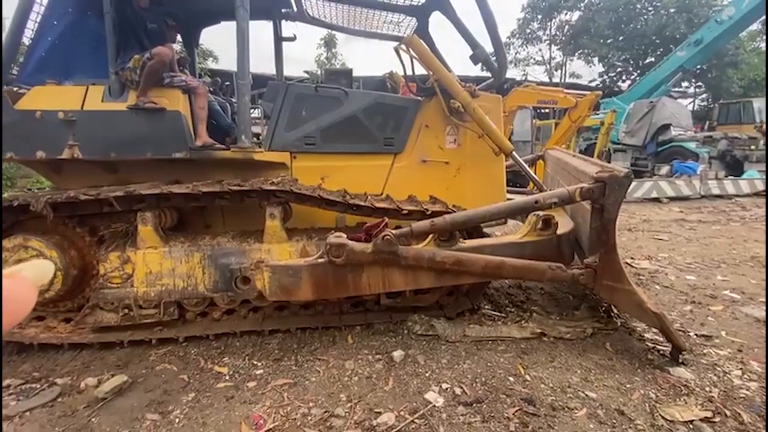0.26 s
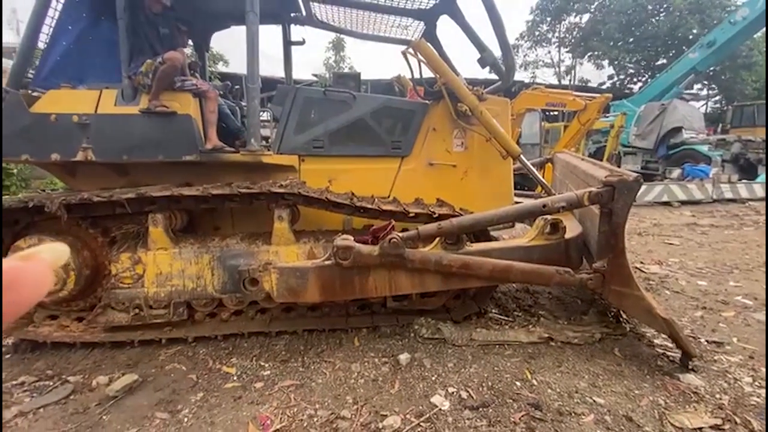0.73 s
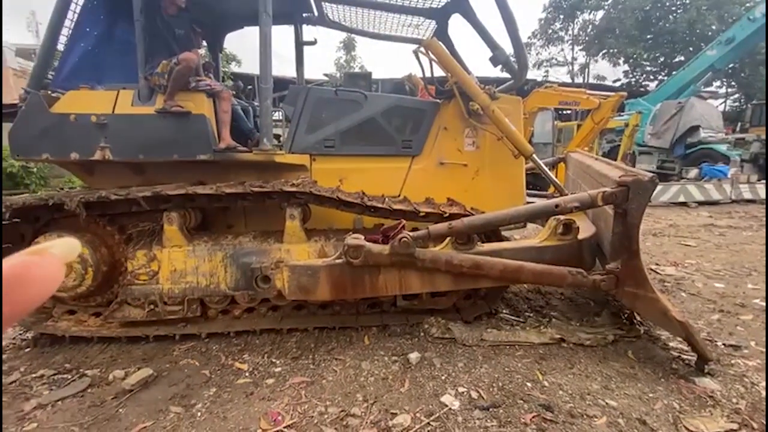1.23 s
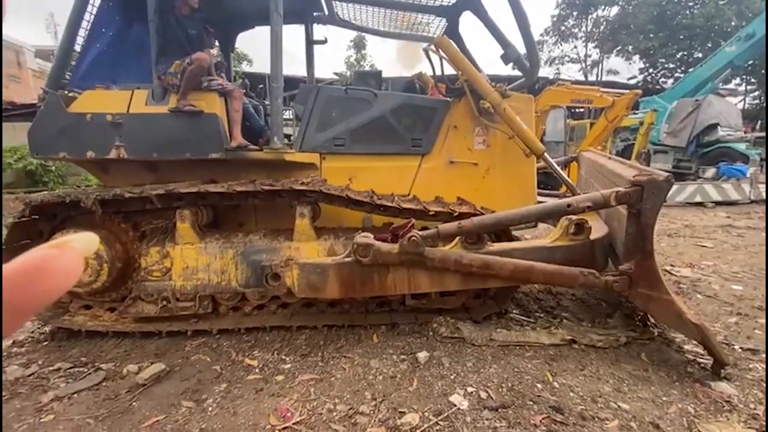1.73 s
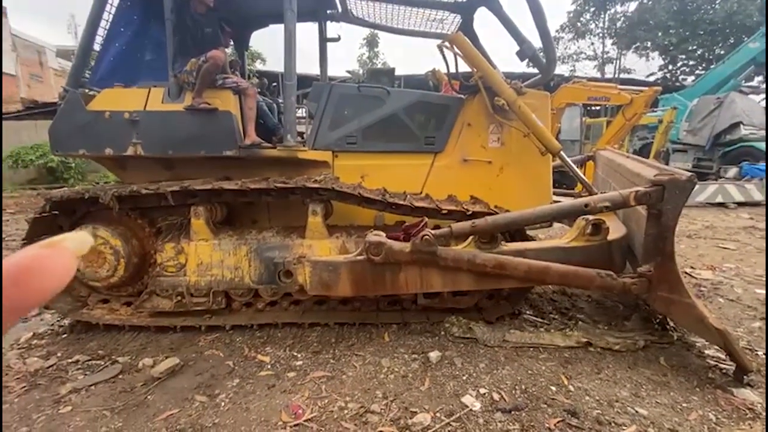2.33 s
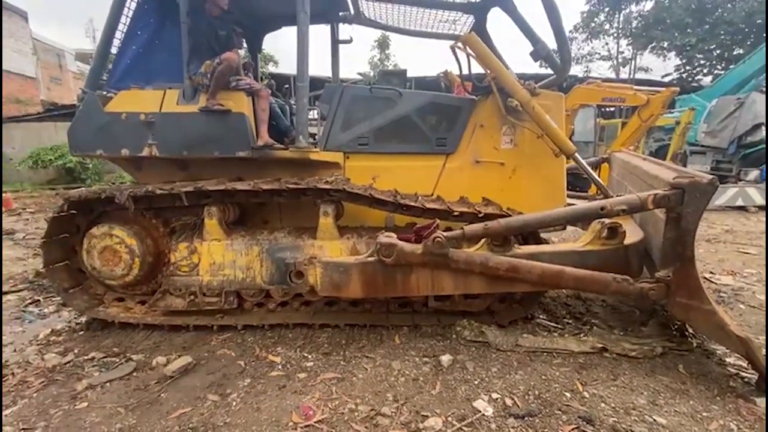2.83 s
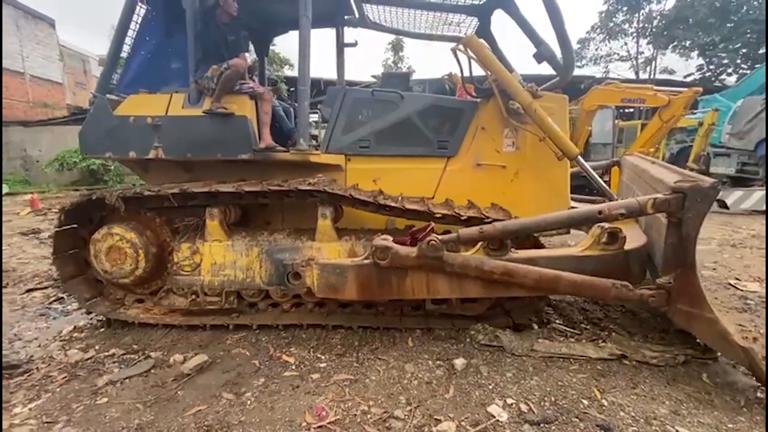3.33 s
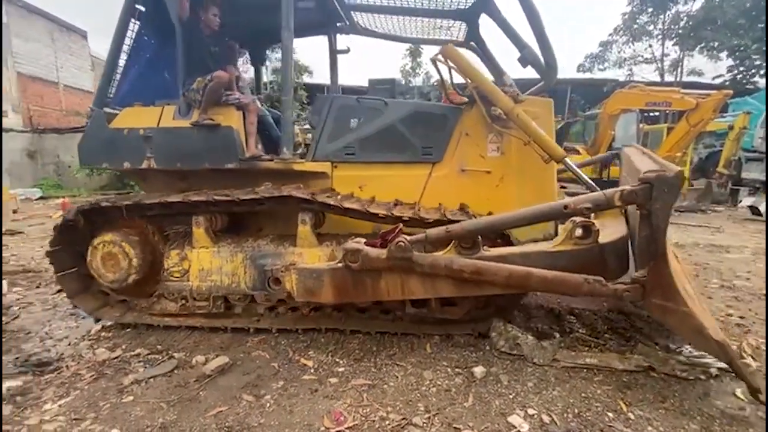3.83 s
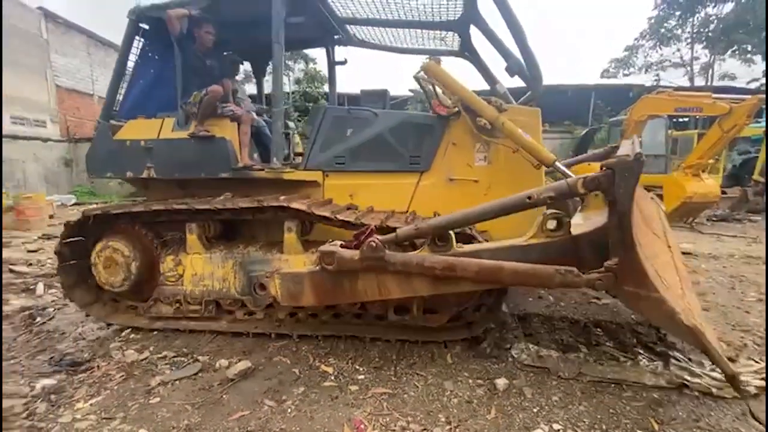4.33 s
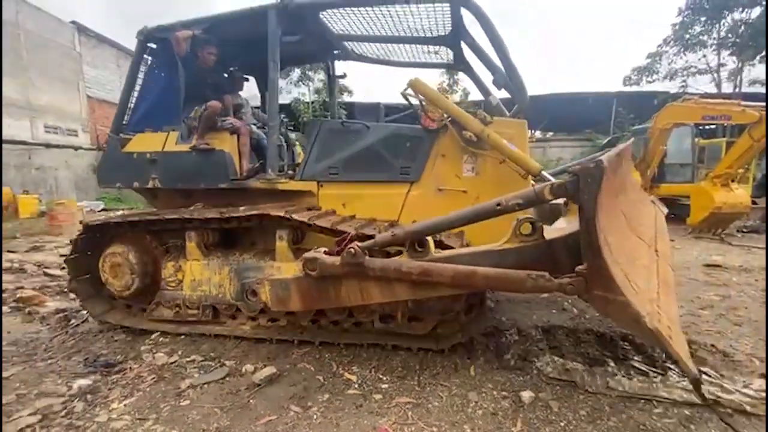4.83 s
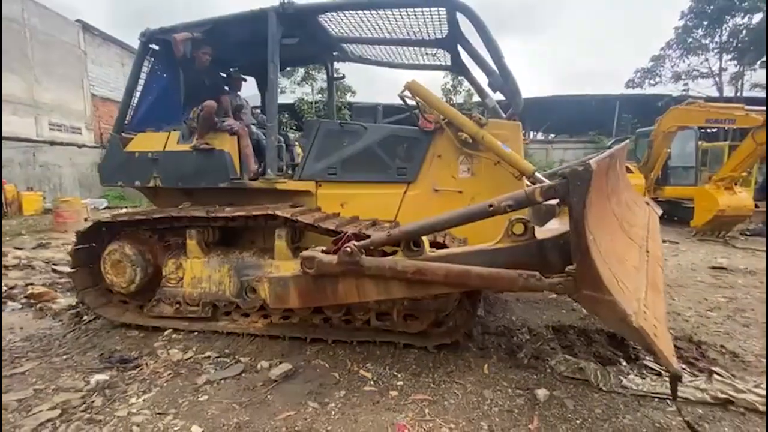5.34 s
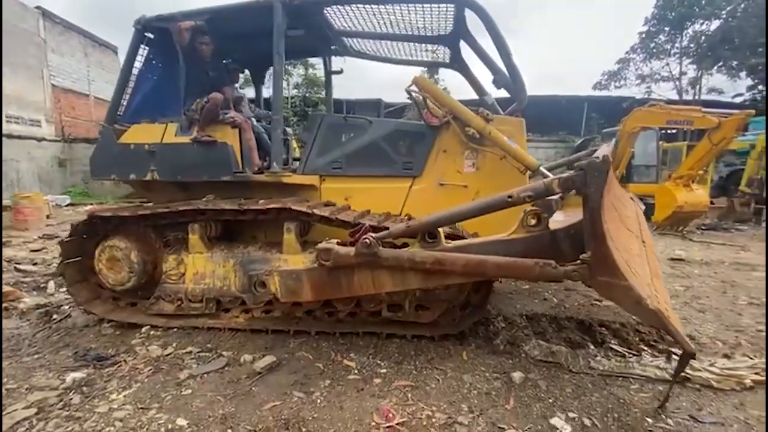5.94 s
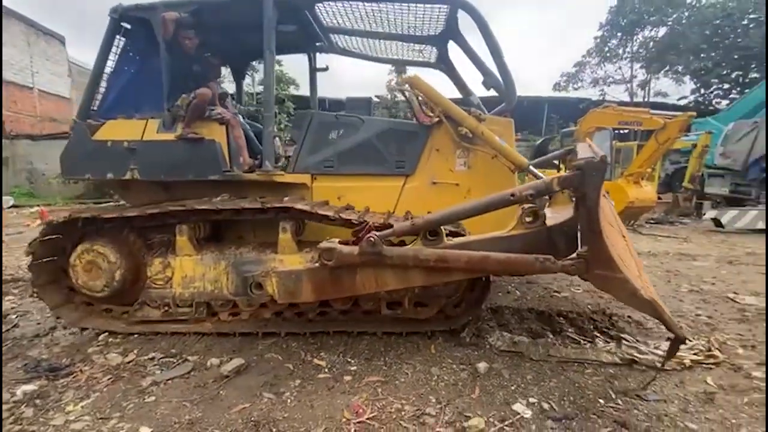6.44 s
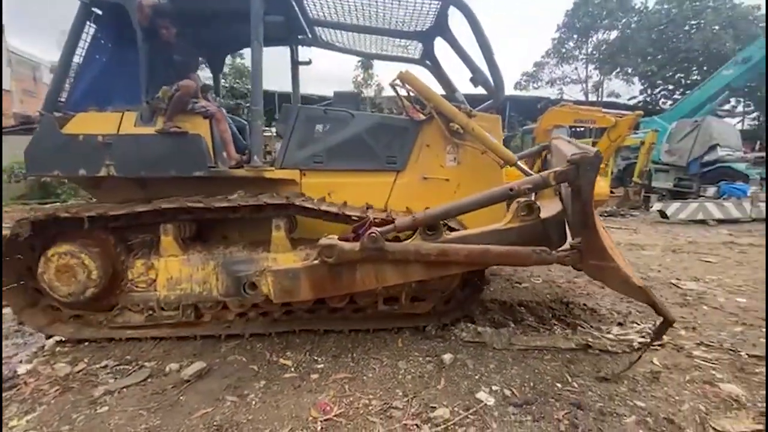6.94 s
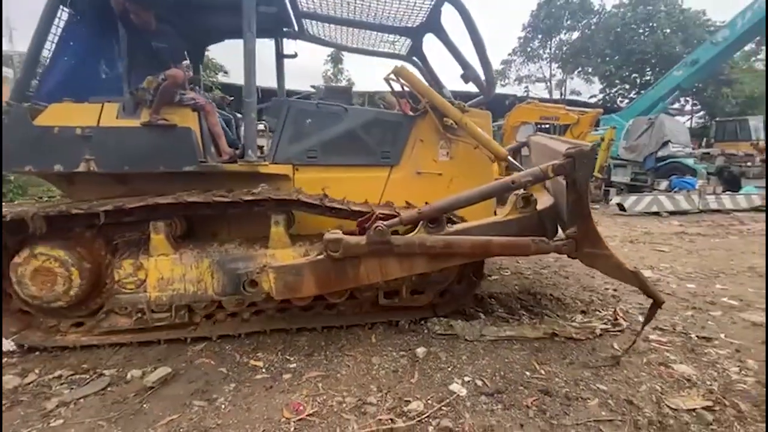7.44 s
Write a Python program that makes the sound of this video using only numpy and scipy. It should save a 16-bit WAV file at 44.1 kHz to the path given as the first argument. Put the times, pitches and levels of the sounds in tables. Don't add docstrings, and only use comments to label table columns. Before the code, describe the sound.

A large bulldozer's diesel, heard a few metres away in an open dirt yard, winds down from a rev with a falling turbo whistle. It is then revved in short bursts, each starting with hard metallic knocks, and settles between them to a low drone with fan hum and rattling casing. Light wind buffets the hand-held stereo microphone, which swings slightly off the engine.

```python
import sys
import numpy as np
from scipy import signal
from scipy.fft import rfft, irfft, next_fast_len
from scipy.io import wavfile
from scipy.ndimage import uniform_filter1d

SR = 44100
rng = np.random.default_rng(int(sys.argv[2]) if len(sys.argv) > 2 else 0)


def amplitude_ratio(level_db):
    exponent = np.asarray(level_db, float) / 20
    return 10 ** exponent


def wav_record(signal):
    frames = np.transpose(np.atleast_2d(signal))
    bounded = np.clip(frames, -1, 1)
    quanta = np.round(bounded * 32767).astype(np.int16)
    wavfile.write(sys.argv[1], SR, quanta)


N = 338247
TIME = np.arange(N) / SR
BINS_HZ = np.fft.rfftfreq(N, 1 / SR)
IDLE_HZ = 58

# time in seconds, firing rate in Hz.
CRANK_SPEED = [(0, 70.93), (.55, 57.23), (1.0, 47.94), (1.19, 47.17), (1.48, 64.87), (1.84, 54.9),
               (2.6, 56.68), (3.07, 55), (3.22, 61.44), (3.46, 65.84), (3.64, 56.52), (4.7, 57.23),
               (4.9, 60.2), (5.2, 58.4), (5.35, 62.35), (5.52, 57.6), (5.9, 60.32), (7.67, 60.4)]
# time in seconds, whistle in Hz.
TURBO_SPEED = [(0, 8920), (.64, 7180), (1.19, 5856), (1.49, 7930), (1.96, 6812), (2.5, 5960), (3.03, 5690),
               (3.29, 7550), (3.5, 8067), (3.66, 7240), (4.0, 7340), (4.78, 7202), (5.19, 6536),
               (5.36, 7220), (5.5, 6680), (5.8, 6925), (6.99, 6344), (7.67, 6462)]
# time in seconds, loss in the sum in dB.
CAMERA_TURN = [
    (0, 5),
    (.95, 2),
    (1.2, 2),
    (3.5, 2),
    (4.3, 3),
    (5.2, 0.5),
    (5.9, 1.5),
    (6.4, 4.5),
    (7.67, 4),
]
# frequency in Hz, likeness 0-1, phase left leads in rad,
# left-right in dB.
DIFFUSE_PORTS = [(60, 1, 0.5, -3), (307, 1, -0.5, 0.5), (600, 0.12, 0.5, 1), (904, 0.63, 1, 4.5),
                 (1300, 0.81, -1.04, 2), (1790, 0.15, 0.1, -2), (2260, 1, 0.83, -2.5), (3910, 0, 2, 1.5),
                 (4400, 0, 3.5, 2.5), (8900, 0, 7.5, 14.5)]


def evened(x):
    return x / np.sqrt(np.mean(x ** 2) + 1e-20)


def curves(rows):
    s, *columns = np.transpose(rows)
    return [np.interp(TIME, s, c) for c in columns]


def across(rows, count=1):
    table = np.transpose(rows)
    return np.interp(np.log(BINS_HZ + 1), np.log(table[0]), table[count])


def lagged(x, lag_s):
    keep = np.exp(-1 / (lag_s * SR))
    return signal.lfilter([1 - keep], [1, -keep], x - x[0]) + x[0]


def drift(hz):
    size = next_fast_len(N, True)
    response = 1 / (1 + (np.fft.rfftfreq(size, 1 / SR) / hz) ** 2)
    return evened(irfft(rfft(rng.standard_normal(size)) * response, size)[:N])


def heard(envelope, shape, modes, ports):
    a, b = rfft(rng.standard_normal((2, N)) * envelope)
    power = amplitude_ratio(across(shape)) ** 2
    for hz, width_hz, db in modes:
        power = power + amplitude_ratio(db) ** 2 / (1 + (2 * (BINS_HZ - hz) / width_hz) ** 2) ** 2
    same = np.clip(across(ports), 0, 1)
    lead_rad = across(ports, count=2)
    tilt = amplitude_ratio(across(ports, count=3) / 2)
    right = (same * a + np.sqrt(1 - same ** 2) * b) * np.exp(-1j * lead_rad)
    return evened(irfft(np.sqrt(power) * np.array([a * tilt, right / tilt]), N))


def firing_turns():
    return np.cumsum(curves(CRANK_SPEED)[0] * (1 + 0.0039 * drift(hz=8.2))) / SR


def fuel():
    # time in seconds, fuel 0-1.
    rack_settings = [(.6, 0.05), (1.0, 0.03), (1.193, 0.93), (1.471, 0.13), (1.53, 0.05), (1.96, 0.29),
                     (3.043, 0.98), (3.291, 0.67), (3.47, 0.14), (3.52, 0.1), (3.681, 0.51), (4.8, 0.12),
                     (5.205, 0.85), (5.34, 0.16), (5.57, 0.58), (5.9, 0.41), (6.6, 0.32)]
    open_lag_s, fall_lag_s = 0.012, 0.014
    s, setting = np.transpose(rack_settings)
    held = np.clip(np.r_[0, setting], 0, 1.2)[np.searchsorted(s, TIME, "right")]
    return np.maximum(lagged(held, open_lag_s), lagged(held, fall_lag_s))


def tones_db():
    # firing rate in Hz, octave level in dB.
    pipe_octave = [(47, -54), (54, -33.5), (60, -31.5), (67, -28.5)]
    light_fuel, firing_lag_s = 0.069, 0.017
    drone_cut_db, drone_on_db = -50, -23.5
    drone_db_per_fuel, drone_db_per_hz, octave_db_per_fuel = 3, 0.13, 3.5
    fan_cut_db, fan_on_db = -41, -31.5
    rack, rate_hz = fuel(), curves(CRANK_SPEED)[0]
    firing = lagged(1 - np.exp(-rack / light_fuel), firing_lag_s)
    drone_db = drone_cut_db + (drone_on_db - drone_cut_db) * firing + drone_db_per_fuel * rack
    drone_db = drone_db + 2 * (1 - firing) * drift(hz=3)
    drone_db = drone_db + drone_db_per_hz * (rate_hz - IDLE_HZ) * firing
    octave_db = np.interp(rate_hz, *np.transpose(pipe_octave)) + octave_db_per_fuel * rack
    fan_db = fan_cut_db + (fan_on_db - fan_cut_db) * firing + 2.6 * drift(hz=1.69)
    return drone_db, octave_db, fan_db


def exhaust_and_fan(turns):
    order_multiples = [3 / 2, 3, 4, 14 / 3, 16 / 3, 6]
    order_levels_db = [-11.5, -13, -7, -10, -10, -12.5]
    fan_ratio = 1.8
    drone_db, octave_db, fan_db = tones_db()
    drone = amplitude_ratio(drone_db) * np.cos(2 * np.pi * turns)
    octave = amplitude_ratio(octave_db + 1.13 * drift(hz=12.0)) * np.cos(4 * np.pi * turns - .8)
    fan_rad = 2 * np.pi * fan_ratio * turns + 0.39 * drift(hz=1.6)
    fan = amplitude_ratio(fan_db + 1.0 * drift(hz=3.3)) * np.cos(fan_rad)
    upper = 0
    for multiple, db in zip(order_multiples, order_levels_db):
        level = amplitude_ratio(octave_db + db + 1.95 * drift(hz=9.6))
        upper = upper + level * np.cos(2 * np.pi * (multiple * turns + rng.random()))
    return np.sqrt(2) * (drone + octave + fan + upper) * amplitude_ratio([[.3], [-.3]])


def load_db():
    # time in seconds, swell in dB, half length in seconds.
    hydraulic_jolts = [(0.08, 2, 0.11), (1.253, 2, 0.11), (1.71, -2.5, 0.063), (3.05, 3.5, 0.078),
                       (3.535, -0.5, 0.058), (3.85, 2, 0.077), (4.118, 3, .06), (4.887, 2.5, 0.052),
                       (5.239, 12.5, 0.019), (5.616, 2, 0.061), (7.26, 4.5, 0.094)]
    rack, faster_hz = fuel(), curves(CRANK_SPEED)[0] - IDLE_HZ
    jolt_db = sum(db * np.exp(-((TIME - s) / half_s) ** 2) for s, db, half_s in hydraulic_jolts)
    rumble_db = -27.5 + 0.28 * faster_hz + 1.5 * rack + jolt_db
    roar_db = -30 + 0.17 * faster_hz + 2.5 * rack + 0.4 * jolt_db
    turbo_khz = (curves(TURBO_SPEED)[0] - 6500) / 1000
    knock_db = -33.5 + 8.5 * rack ** 1.66 + 1.77 * turbo_khz
    knock_db = knock_db + 3 * (rack - lagged(rack, 0.11))
    return rumble_db, roar_db, knock_db - 0.35 * curves(CAMERA_TURN)[0]


def turbo(turns):
    # whistle in Hz, level in dB.
    intake_duct = [(5700, -22.5), (5950, -24.5), (6250, -29.5), (6550, -30), (6900, -35), (7250, -31.5),
                   (7900, -37.5), (9000, -30)]
    # time in seconds, gain in dB, left-right in dB,
    # phase left leads in rad.
    intake_bearing = [(0, 1, -0.5, 2.9), (1.0, 2, -1, 3.7), (1.25, -4.5, -1.5, 5.4), (1.8, -0.5, -3, 10.2),
                      (2.8, -1.5, 5.5, 6.5), (3.6, 0, 3, 7.9), (4.6, 1, 0.5, 6), (5.6, 0, 0.5, 6.5),
                      (6.3, -2, -6, 4.8), (7.67, -0.5, -1.5, 3.75)]
    rotor_lag_s, spool_s, spool_db = 0.05, 0.13, 7
    db_per_fuel, sway_db, pan_sway_db = 7, 2, 0.5
    rack = fuel()
    hz = uniform_filter1d(curves(TURBO_SPEED)[0], size=int(rotor_lag_s * SR), mode="nearest")
    facing_db, pan_db, lead_rad = curves(intake_bearing)
    db = facing_db + np.interp(hz, *np.transpose(intake_duct)) + db_per_fuel * rack
    db = db + sway_db * drift(hz=1.8)
    db = db + spool_db * np.maximum(rack - lagged(rack, spool_s), 0)
    pan_db = pan_db + pan_sway_db * drift(hz=2.8)
    lead_rad = lead_rad + 0.32 * drift(hz=5.5)
    angle = 2 * np.pi * np.cumsum(hz * (1 + 0.00121 * drift(hz=31.3))) / SR
    angle = angle + 0.5 * np.sin(2 * np.pi * turns)
    depth = .45 + .22 * drift(hz=8)
    throb = 1 + depth * np.cos(2 * np.pi * turns - 1.2) + 0.051 * np.cos(np.pi * turns)
    surge_db = np.clip(load_db()[2] + 33.5, 0, 8)
    blur = np.array([drift(hz=135) + 1j * drift(hz=133) for _ in range(2)])
    wheel = throb * (amplitude_ratio(2.06 * drift(hz=9.7) - 0.3 * surge_db) + amplitude_ratio(-6) * blur)
    side = np.array([[.5], [-.5]])
    tone = (wheel * np.exp(1j * (angle + side * lead_rad))).real * amplitude_ratio(side * pan_db)
    return amplitude_ratio(db) * (tone + amplitude_ratio(-34) * np.cos(2 * angle))


def exhaust_rumble(rumble_db):
    # frequency in Hz, density in dB per Hz.
    rumble_spectrum = [(20, -26), (45, -11), (80, 1), (150, -2), (200, -5), (280, 1.5), (350, -0.5),
                       (450, -6), (620, -11), (900, -40.5)]
    return amplitude_ratio(rumble_db - 1.04) * heard(amplitude_ratio(1.3 * drift(hz=16)), rumble_spectrum, [], DIFFUSE_PORTS)


def casing_roar(roar_db):
    # frequency in Hz, density in dB per Hz.
    roar_spectrum = [(350, -7.5), (550, -8), (700, -8.5), (900, -3.5), (1300, -7.5), (1600, -10.5),
                     (1850, -12.5), (2500, -14.5), (3500, -16.5), (5000, -13.5), (7000, -30), (8600, -34.5),
                     (9600, -33), (10200, -53), (12000, -72)]
    # frequency in Hz, width in Hz, level in dB.
    panel_modes = [(992, 76, .5), (1139, 74, -3), (760, 100, -6.5), (2040, 100, -33)]
    return amplitude_ratio(roar_db + 1.48) * heard(amplitude_ratio(1.12 * drift(hz=60)), roar_spectrum, panel_modes, DIFFUSE_PORTS)


def knock(turns, knock_db):
    # frequency in Hz, density in dB per Hz.
    knock_spectrum = [(500, -14), (1000, -38.5), (1600, -7.5), (2800, -10.5), (3700, -2.5), (4500, -8),
                      (5200, -5.5), (6500, 0.5), (7600, -5), (8600, -10), (9500, -19), (10300, -13.5),
                      (11500, -15.5), (12100, -37)]
    # frequency in Hz, width in Hz, level in dB.
    block_modes = [(5890, 170, 3.5), (2030, 55, 1.5), (1026, 71, -4), (8600, 420, -10.5), (3990, 130, -2.5),
                   (3405, 80, -1.5), (5060, 90, -3)]
    # frequency in Hz, width in Hz, level in dB.
    head_modes = [(5960, 710, 14), (1040, 240, 13), (8560, 390, 2.5)]
    # time in seconds, peak in dB.
    hard_firings = [(1.1972, -10.5), (1.2216, -7.5), (1.2587, -4), (1.3004, -13), (1.368, -10),
                    (1.4194, -11.5), (3.047, -8.5), (3.0665, -9), (3.087, -10), (3.1034, -9), (3.2196, -12),
                    (3.251, -9.5), (5.2075, -13), (5.2324, -12), (5.292, -18), (5.3044, -31), (5.593, -25)]
    # frequency in Hz, likeness 0-1, phase left leads in rad,
    # left-right in dB.
    direct_ports = [(900, 0.32, -2.2, 9.5), (1700, 0.78, 0.4, 11), (2310, 1, -6, 10.5),
                    (3080, 0.42, 0.2, -3), (3700, 0.26, 2, -3), (4350, 0.071, -1, -2.5),
                    (6210, 0.69, 0.9, 3), (8030, 0.96, 2, -7), (8870, 0.54, 12.5, 10), (8920, .93, 0, 9),
                    (9585, 0.4, -21, 14.5), (10330, 0.71, 1.5, -5.5)]
    bite_db = 1.21 * (knock_db + 34) - 34
    which = turns.astype(int)
    size = amplitude_ratio(3.6 * np.clip(rng.standard_normal(1000), -2, 2))[which]
    since = turns - which
    burst = amplitude_ratio(bite_db) * (.7 + size * (1 - np.exp(-since / .03)) * np.exp(-since / .4))
    blows = 0
    for s, db in hard_firings:
        after_s = np.maximum(TIME - s, 0)
        blows = blows + amplitude_ratio(db - 4.0) * (1 - np.exp(-after_s / 0.00045)) * np.exp(-after_s / 0.0061)
    ringing = np.sqrt(np.mean(blows ** 2)) * heard(blows, knock_spectrum, head_modes, direct_ports)
    rattle = np.sqrt(np.mean(burst ** 2)) * heard(burst, knock_spectrum, block_modes, direct_ports)
    return rattle + ringing


def wind():
    # time in seconds, level in dB.
    breeze_level = [(0, -32), (.9, -32), (1.3, -48), (2.0, -32), (2.7, -24), (4.2, -27.5), (4.4, -31),
                    (4.75, -24), (5.1, -44), (5.45, -27), (6.0, -35), (6.3, -47), (7.67, -63)]
    # frequency in Hz, density in dB per Hz.
    gust_spectrum = [(20, -17), (53, 13), (85, 8.5), (215, 5.5), (400, -10.5), (800, -43)]
    # frequency in Hz, likeness 0-1, phase left leads in rad, left-right in dB.
    wind_ports = [(20, 0.62, 2.64, 14.5), (800, 0.89, 2.36, -0.5)]
    return amplitude_ratio(curves(breeze_level)[0] - .3) * heard(amplitude_ratio(2.6 * drift(hz=5)), gust_spectrum, [], wind_ports)


def scene():
    turns = firing_turns()
    rumble_db, roar_db, knock_db = load_db()
    engine = exhaust_rumble(rumble_db) + casing_roar(roar_db) + knock(turns, knock_db)
    return engine + exhaust_and_fan(turns) + turbo(turns) + wind()


def thinned(pair, margin_db):
    hz, t, z = signal.stft(pair, SR, nperseg=1024)
    turn_db = np.interp(t, *np.transpose(CAMERA_TURN))
    loss_db = np.exp(-((hz[:, None] - 4600) / 1400) ** 2) * turn_db
    notch_db = 14 * (abs(hz[:, None] - 9330) < 330)
    z = z * amplitude_ratio(np.array([-loss_db - notch_db, loss_db / 2]))
    power = abs(z) ** 2
    patch = uniform_filter1d(uniform_filter1d(power, size=3, axis=1), size=3, axis=2)
    reach = np.exp(-1 / 18)
    total = uniform_filter1d(power.sum(0), size=5, axis=1)
    below = signal.lfilter([1 - reach], [1, -reach], total, axis=0)
    mask = below * amplitude_ratio(-2 * np.interp(hz, *np.transpose(margin_db)))[:, None]
    return signal.istft(z * (patch > mask), SR, nperseg=1024)[1][:, :N]


def top_cut(x):
    return signal.sosfilt(signal.butter(12, 12760, fs=SR, output="sos"), x)


def record(dry):
    edge_hz, mono_hz = 11950, 10150
    mid, side = rfft(dry[0] + dry[1]) / 2, rfft(dry[0] - dry[1]) / 2
    pair = irfft(np.array([mid * (BINS_HZ < edge_hz), side * (BINS_HZ < mono_hz)]), N)
    margin_db = [(1500, 24), (2800, 14), (3800, 9), (4500, 7.5), (5000, 7.5), (5400, 6), (6000, 10),
                 (6800, 12), (7600, 13), (8150, 7), (8550, 12.5), (8900, 6), (9500, 13), (10200, 8),
                 (11800, 5)]
    mid, side = thinned(pair, margin_db)
    return top_cut(np.array([mid + side, mid - side]))


dry = scene()
out = record(dry)
wav_record(out)
```